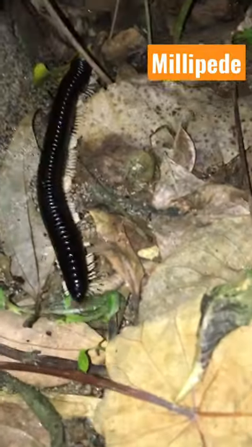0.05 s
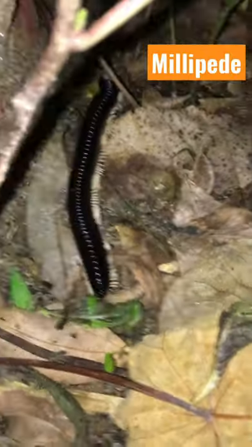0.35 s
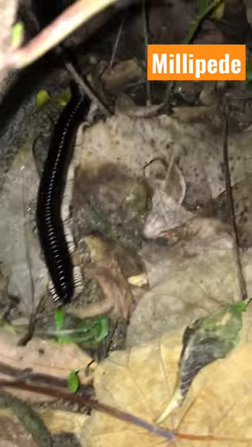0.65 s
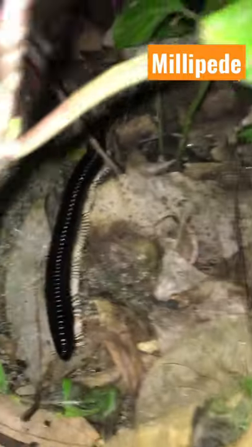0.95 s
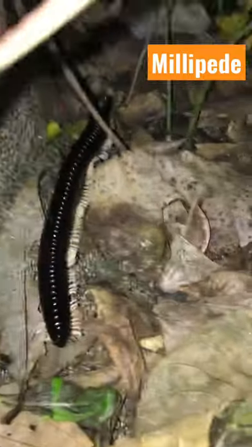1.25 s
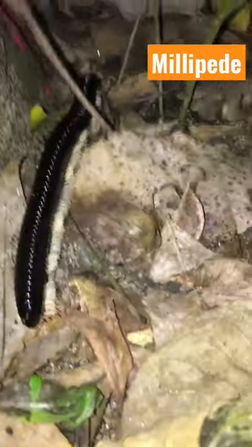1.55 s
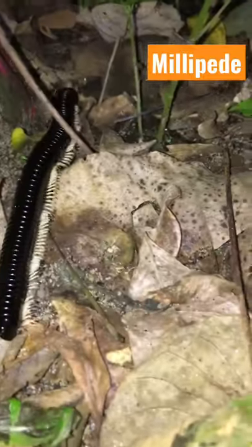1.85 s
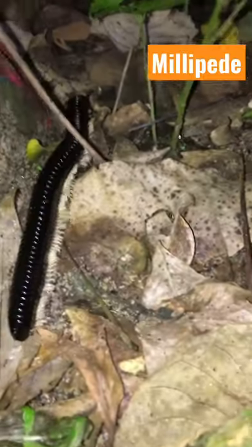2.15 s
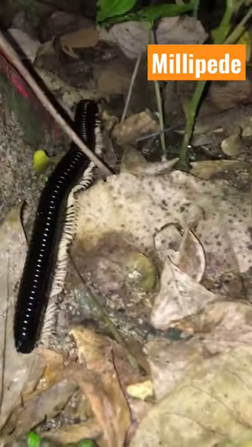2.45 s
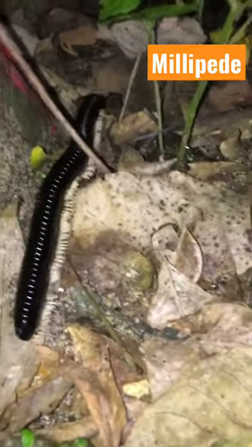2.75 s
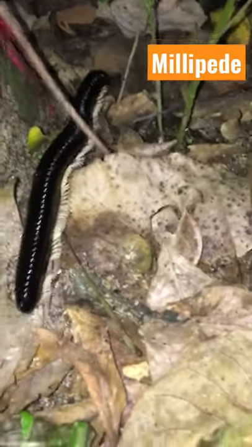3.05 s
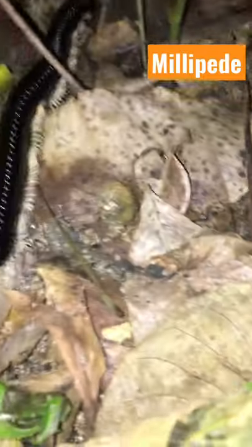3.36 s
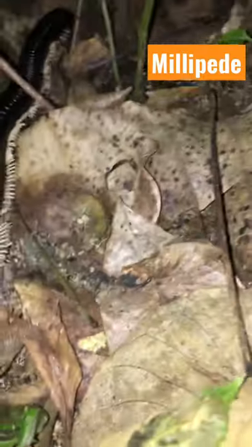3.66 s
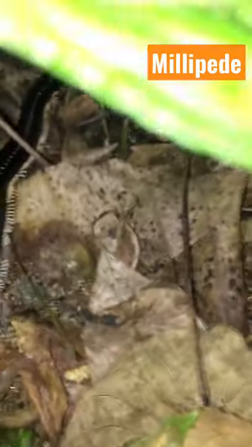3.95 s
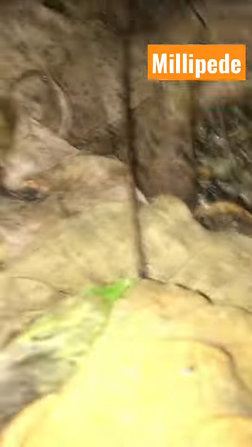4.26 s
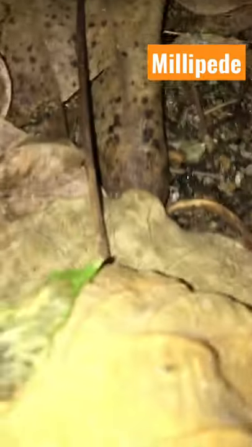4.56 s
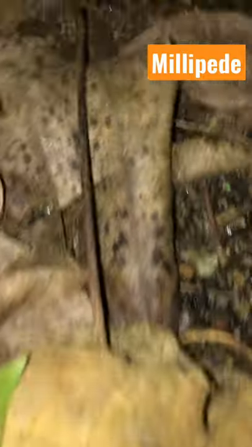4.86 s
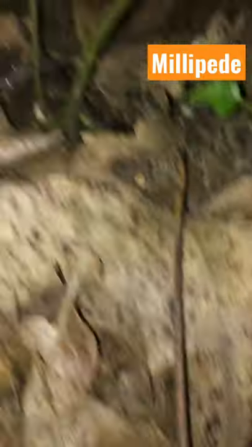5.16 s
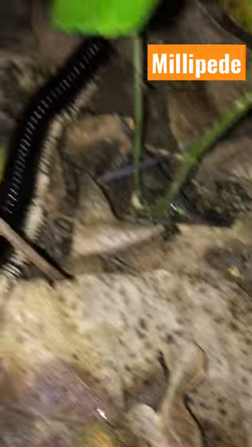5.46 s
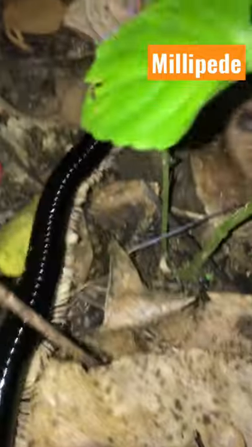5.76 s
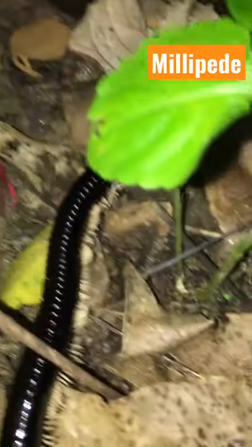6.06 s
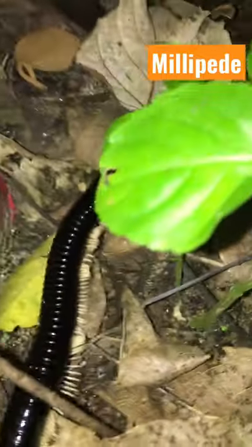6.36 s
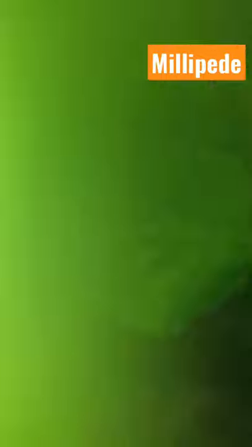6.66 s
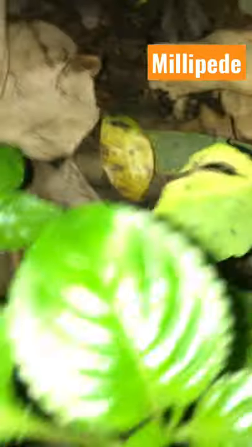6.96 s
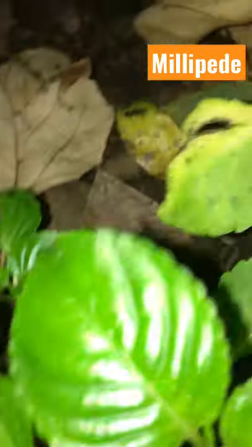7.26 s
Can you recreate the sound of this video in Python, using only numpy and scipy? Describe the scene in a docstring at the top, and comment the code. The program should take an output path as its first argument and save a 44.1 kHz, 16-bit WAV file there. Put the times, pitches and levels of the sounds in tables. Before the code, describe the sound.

Close, irregular crackling of dry leaf litter and snapping stalks, with one sharp thump of foliage on the microphone near the end.

```python
"""Dry leaf litter slides and crinkles in uneven swells as someone crouching in it at night shifts about.
Tiny fractures ring patches of leaf over sliding noise; single blades and stalks buckle and snap.
Plants knock and drag on the hand-held microphone, hardest near the end, and its housing rings.
Below: soft swishes, a dull ground shuffle, low handling rumble and a faint steady hiss."""
import sys
import numpy as np
from scipy import signal
from scipy.fft import rfft, irfft, next_fast_len
from scipy.io import wavfile
from scipy.ndimage import uniform_filter1d

SR = 44100
rng = np.random.default_rng(int(sys.argv[2]) if len(sys.argv) > 2 else 0)


def digitize_waveform(pressure):
    """Quantize a signal to 16-bit integers and store it at the path in sys.argv[1].

    Rows of a 2-D input are taken as channels; values are limited to [-1, 1].
    """
    field = np.atleast_2d(pressure).T
    bounded = np.clip(field, -1, 1)
    quanta = np.round(bounded * 32767).astype(np.int16)
    wavfile.write(sys.argv[1], SR, quanta)


N = 322812

# pushes through the litter: (peak time [s], body level [dB], top re body [dB], rise [s], fall [s])
PUSHES = [(1.14, -55, -9, 0.11, 0.094), (1.435, -49.5, -4, 0.078, .07), (1.57, -53, -5, 0.068, 0.072),
          (1.68, -57, -8, .03, .08), (2.042, -58, -6, 0.085, 0.058), (2.321, -48, 0.5, 0.084, 0.085),
          (2.41, -48, -4.5, 0.074, .14), (2.87, -49, -4, 0.023, 0.051), (2.96, -47, -5, .035, 0.025),
          (3.03, -50, -7, 0.02295, 0.041), (3.161, -50, -7, 0.063, 0.081), (3.68, -52, -6.5, 0.043, 0.0527),
          (4.19, -47, -5.5, 0.063, 0.1), (4.39, -50, -4, 0.053, 0.069), (4.5, -42, -9, 0.092, 0.083),
          (4.59, -41.5, -7.5, 0.037, 0.053), (4.69, -37, -6, 0.046, 0.0594), (4.81, -44.5, -2, .15, .2),
          (5.0, -40, -10, .14, 0.077), (5.07, -43, -7, 0.028, 0.0272), (5.151, -48, -4.5, 0.0562, .06),
          (5.218, -42, -10.5, .013, 0.048), (5.367, -42, -8, 0.051, .025), (5.42, -52, 0.5, 0.068, .11),
          (5.71, -56.5, -5, 0.11, 0.062), (5.81, -55, -5.5, .03, 0.0297), (6.04, -55.5, -1.5, 0.101, 0.077),
          (6.18, -55.5, -4, 0.019, .03), (6.311, -55.5, -4.5, .08, .08), (6.42, -55.5, -7, 0.039, 0.14),
          (6.65, -43.5, -1.5, 0.032, 0.049), (6.72, -43, -3, 0.033, 0.11), (6.91, -49, -5, .12, 0.1)]
# faint stirring between pushes: (time [s], body level [dB], top level [dB])
STIRRING = [(0, -72, -71), (.6, -72, -90), (.85, -64, -71.5), (1.8, -65, -66.5), (2.7, -72, -67),
            (3.4, -63, -68.5), (3.95, -71, -73), (5.6, -62, -63.5), (5.88, -68, -68.5), (7.3, -61, -60.5)]
# rustle body: (frequency [Hz], relative level [dB])
BODY_SPECTRUM = [(600, 0), (800, -3), (1150, -0.5), (1800, 2), (2450, -1), (3200, -4), (4000, -5.5),
                 (5000, -7)]
# crisp rustle top: (frequency [Hz], relative level [dB])
TOP_SPECTRUM = [(5000, -0.5), (6000, -0.5), (7500, -6), (9200, -2), (11000, -2.5), (13500, -6.5),
                (15700, -6)]
# blades and stalks buckling:
# (time [s], relative body level [dB], pitch [Hz], woodiness [0-1], relative top level [dB], decay [s])
BUCKLES = [(0.082, -44, 2300, 0.33, -39, 0.0012), (.6765, -44, 1550, 0.9, -60, 0.0018),
           (.9055, -54, 2980, 0, -45, .0026), (1.24, -44, 2000, 0.5, -43.5, 0.0017),
           (1.3343, -31, 1620, .7, -52, .001), (1.4435, -34, 2410, 0.2, -43, .003),
           (1.532, -37.5, 1400, 0.45, -43, 0.00225), (1.5522, -41, 2330, 0.4, -40, 0.0017),
           (1.5995, -32.5, 5140, 0.56, -45, 0.0028), (1.6645, -40.5, 2110, .3, -38, 0.0014),
           (1.7025, -54, 1620, 0.11, -40, 0.0011), (1.9733, -58, 5600, 0.4, -43, 0.0012),
           (2.053, -30.5, 3143, 0.67, -36.5, 0.0022), (2.1573, -42.5, 5600, 0.4, -45, 0.002),
           (2.1908, -45, 5500, 0.4, -42, 0.0021), (2.3565, -33.5, 4240, 0.63, -57.5, .0011),
           (2.958, -38, 2259, 0.36, -43, 0.00757), (3.1613, -37.5, 1689, 0.4, -43, 0.0027),
           (3.176, -43, 2500, 0.29, -39, .0012), (3.2215, -40.5, 1774, 0.7, -43, 0.0015),
           (3.2835, -49, 2260, 0.24, -41, 0.0011), (3.3973, -35.5, 2527, 0.5, -35.5, 0.0016),
           (3.6897, -33, 2050, 0.36, -36, 0.001893), (3.697, -30, 1774, 0.72, -50, 0.00263),
           (4.2399, -37.5, 2002, 0.45, -34, 0.0008), (4.5076, -31, 1840, .5, -29.5, 0.0036),
           (4.569, -31, 2092, 0.41, -29, .0017), (4.592, -30.5, 5555, 0.1, -27, .0029),
           (4.5994, -15, 3950, 0.75, -25, 0.00087), (4.6325, -31, 2130, 0.68, -54, 0.00086),
           (4.6764, -28, 5527, 0.3, -28, 0.002), (4.6972, -21, 2660, 0.2, -29.5, 0.0036),
           (4.699, -18, 3596, 0.77, -49, 0.0008), (4.7045, -26.5, 1540, 0.33, -29, 0.0012),
           (4.8455, -38, 5760, 0.4, -27.5, .0012), (4.9974, -32, 2486, .5, -47.5, .002),
           (5.0138, -23.5, 2375, 0.37, -26, 0.00096), (5.0595, -32.5, 2317, 0.68, -46, 0.0025),
           (5.075, -34, 2098, 0.36, -31, 0.00331), (5.1102, -28.5, 1945, .8, -53, 0.0029),
           (5.128, -34, 2050, 0.63, -52, 0.003), (5.2086, -29, 3605, 0.1, -27.5, 0.0013),
           (5.215, -49.5, 3606, 0.12, -31, 0.0021), (5.223, -36.5, 2327, 0.47, -44, .0031),
           (5.2815, -34, 2540, 0.42, -48, 0.0013), (5.345, -30.5, 3118, 0.77, -32, 0.00085),
           (5.3528, -26, 2982, 0.7, -41.5, 0.0016), (5.365, -23.5, 3105, 0.66, -40, 0.00072),
           (5.787, -52, 5495, 0.22, -36, 0.0013), (5.918, -35.5, 5440, 0.54, -34.5, 0.00099),
           (6.0414, -38.5, 1069, 0.38, -53, .0014), (6.2954, -39, 3991, 0.54, -42, 0.00089),
           (6.3853, -35, 2715, 0.45, -44, 0.00235), (6.4658, -33.5, 1211, 0.39, -36, 0.001),
           (6.5898, -37.5, 3578, 0.22, -37, 0.0017), (6.634, -42, 5530, 0.22, -31, .005),
           (6.668, -43, 2180, 0.6, -31.5, .0013), (6.7408, -25.5, 3300, 0.34, -27, 0.0019),
           (6.928, -37, 1631, 0.1, -42, 0.0037), (6.977, -39, 4110, 0.33, -58, 0.0021),
           (7.176, -29, 2533, 0.52, -53, .0012)]
# knocks on the housing: (time [s], impulse [dB], contact [s], rebounds [count])
HOUSING_KNOCKS = [(.078, -24, 0.014, 0), (3.69, -38, 0.00406, 0), (4.674, -28.5, 0.0027, 0),
                  (4.696, -31, 0.005, 1), (5.073, -34, 0.0035, 0), (6.4656, -42, 0.00064, 0),
                  (6.599, -36, 0.00076, 0), (6.633, -23.5, .0012, 0), (6.644, -17, 0.00488, 0),
                  (6.659, -27.5, 0.0022, 4), (6.733, -27, 0.0015, 0), (6.7404, -16, 0.0003, 0),
                  (6.743, -10.5, 0.00088, 3), (6.81, -29.5, 0.0022, 1)]
# housing resonances: (frequency [Hz], gain [dB], t60 [s])
HOUSING_MODES = [(84, -10.5, 0.065), (138.7, -6, 0.038), (204.3, -1.5, 0.025), (365, -5, 0.035),
                 (499.8, 0, 0.018), (789.4, -5, 0.0054), (1550, 7.5, 0.0053), (2233, 11, 0.0061)]
# foliage dragging over the housing: (peak time [s], level [dB], rise [s], fall [s])
FOLIAGE_DRAGS = [(4.479, -46.5, 0.059, 0.0635), (4.595, -36, 0.033, 0.028), (4.695, -35, 0.031, 0.0289),
                 (4.85, -44.5, 0.04, 0.0283), (5.08, -41.5, 0.058, 0.064), (5.96, -53, 0.023, 0.049),
                 (6.26, -50.5, 0.05, 0.061), (6.41, -50.5, .04, 0.12), (6.655, -25.5, 0.0247, 0.021),
                 (6.755, -30.5, 0.054, 0.039)]
# dull rubbing: (frequency [Hz], relative level [dB])
SHUFFLE_SPECTRUM = [(70, -7), (130, -1), (190, -4), (260, -8), (450, -16.5), (800, -18.5)]
# soft swishes: (time [s], level [dB], nominal low edge [Hz], nominal high edge [Hz], rise [s], t60 [s])
SWISH_BANDS = [(0.675, -51.5, 1240, 2040, .001, 1.21), (1.287, -54, 1275, 1874, 0.0032, 0.58),
               (1.333, -50.5, 1360, 1990, 0.004, 1.44), (3.795, -50.5, 2301, 2930, 0.041, .42)]
# handling rumble: (frequency [Hz], relative level [dB])
RUMBLE_SPECTRUM = [(13, -27), (22, -4), (37, 3.5), (59, 1.5), (131, -5.5), (176, -9.5), (226, -10.5),
                   (281, -14), (389, -13.5), (421, -18), (601, -19), (771, -27), (900, -25), (1170, -28),
                   (1980, -120)]
# steady hiss: (frequency [Hz], relative level [dB])
HISS_SPECTRUM = [(650, 2.5), (900, -6), (1600, -3), (2400, 4.5), (3100, -1), (3700, 2), (4400, -0.5),
                 (5400, -4), (6200, -6), (7200, -16.5), (9500, -16.5), (11000, -19), (16000, -21)]
# microphone port, three dips and one lift: (centre [Hz], width [Hz], gain [dB])
PORT_BANDS = [(2950, 380, -3), (4770, 1000, -4.5), (7200, 4500, 2.5), (10500, 1850, -6.5)]

ORDINARY_DB = -45  # rustle body level at 0 dB effort


def leaves(body_db, top_db, fractures_per_s=1300, size_spread_db=4.5, clump_db=2.5, flutter_db=2.2):
    """Harder movement gives more fractures, and more sliding of blade on blade under them."""
    effort_db = body_db - ORDINARY_DB
    rate_per_s = fractures_per_s * from_db(0.5 * effort_db + clump_db * drift(30))
    sizes = from_db(size_spread_db * np.minimum(rng.exponential(1, N), 4))
    sizes /= np.sqrt(uniform_filter1d(rate_per_s, SR // 8))  # density leaves mean power unchanged
    coarse, fine = (rng.random((2, N)) < rate_per_s / SR) * sizes
    slide_gain = from_db(0.2 * effort_db)
    slide = slide_gain * from_db(flutter_db * drift(58)) * rng.standard_normal(N)

    def with_slide(grains, weight):
        return (grains + weight * slide) / np.hypot(1, weight * slide_gain)

    body = with_slide(crinkle(coarse, 877, 6320, t60_cycles=13), weight=1.56)
    top = with_slide(crinkle(fine + 0.28 * coarse, 4800, 17000, t60_cycles=29), weight=1.17)
    body = wander(colour(body, BODY_SPECTRUM), 859, 4920, depth_db=2.4, rate_hz=7.5, count=14)
    top = wander(colour(top, TOP_SPECTRUM), 5140, 16600, depth_db=1.5, rate_hz=6.9, count=18)
    return body * from_db(body_db + 1.47) + top * from_db(top_db + 1.25)


def crinkle(fractures, low_hz, high_hz, t60_cycles, patches=14, hit_chance=0.3):
    """Each tiny fracture rings a few leaf patches, picked at random; rms 1."""
    at, out = np.flatnonzero(fractures), np.zeros(N)
    for hz in np.geomspace(low_hz, high_hz, patches):
        struck = np.zeros(N)
        struck[at] = fractures[at] * rng.standard_normal(len(at)) * (rng.random(len(at)) < hit_chance)
        out += np.diff(ring(struck, hz, t60_cycles / hz), prepend=0)
    return unit_rms(out)


def wander(x, low_hz, high_hz, depth_db, rate_hz, count):
    """As other blades come into contact, bands swell and sink independently; rms 1."""
    size = next_fast_len(N)
    bin_hz = np.arange(size // 2 + 1) * SR / size
    band_index = np.interp(bin_hz, np.geomspace(low_hz, high_hz, count), np.arange(count))
    spectrum = rfft(x, size)
    bands = (irfft(spectrum * np.maximum(1 - abs(band_index - k), 0), size)[:N] for k in range(count))
    return unit_rms(sum(part * from_db(depth_db * drift(rate_hz)) for part in bands))


def movement():
    """Pushes add power to the faint stirring; returns rustle body and top levels [dB]."""
    times_s, *levels_db = np.transpose(STIRRING)
    body, top = from_db([np.interp(np.arange(N) / SR, times_s, db) for db in levels_db]) ** 2
    for peak_s, level_db, crisp_db, rise_s, fall_s in PUSHES:
        push = swell(peak_s, level_db, rise_s, fall_s)
        body += push
        top += push * from_db(crisp_db) ** 2
    return 10 * np.log10(body), 10 * np.log10(top)


def snaps(rows, rise_share=0.4, t60_cycles=12, body_gain_db=-1.9157, top_gain_db=-6.0, size=1400):
    """A crease runs through a blade in a flurry of fractures; the woodier, the more it rings."""
    out = np.zeros(N + size)
    t = (np.arange(size) - size // 4) / SR
    decays_s = np.array(rows)[:, -1:]
    creases = np.exp(np.where(t < 0, t / rise_share, -t) / decays_s)
    coarse, fine = rng.standard_normal((len(rows), 2, size)).swapaxes(0, 1) * creases
    cracks = band(coarse, low_hz=926, high_hz=5050, passes=2)
    tops = band(fine, low_hz=6070, high_hz=13920, passes=2)
    for k, (time_s, body_db, hz, woody, top_db, _) in enumerate(rows):
        # the blade swings with the crease, then rings on
        swing = unit_burst(creases[k] * np.sin(2 * np.pi * hz * t))
        ringing = unit_burst(np.gradient(ring(fine[k], hz, t60_cycles / hz)))
        note = unit_burst(swing + ringing)
        body = unit_burst(woody * note + (1 - woody) * unit_burst(cracks[k]))
        top = unit_burst(tops[k])
        snap = from_db(body_db + body_gain_db) * body + from_db(top_db + top_gain_db) * top
        start = max(round((time_s + t[0] - 0.0004) * SR), 0)
        out[start:start + size] += snap[:len(out) - start]
    return out[:N]


def ticks(effort_db, ordinary_per_s=11, scatter_db=4.5, woody=0.42, decay_s=0.0033, candidates=200):
    """Lesser chance snaps, denser and louder with effort; rows as in BUCKLES."""
    position, luck, pitch = rng.random((candidates, 3)).T
    local_db = effort_db[(position * N).astype(int)]
    body_db, top_db = 0.42 * local_db + scatter_db * rng.standard_normal((candidates, 2)).T
    hz = 1620 * (5600 / 1620) ** pitch
    columns = np.broadcast_arrays(position * N / SR, body_db - 44.5, hz, woody, top_db - 46, decay_s)
    rate_per_s = ordinary_per_s * from_db(0.55 * local_db)
    return list(np.transpose(columns)[luck < rate_per_s * N / SR / candidates])


def knocks(rebound_gap_s=0.009, rebound_loss_db=5, rebound_contact_s=0.0026):
    """Knocks ring the housing, duller with longer contact; a springy stalk rebounds ever more weakly."""
    force = np.zeros(N)
    for time_s, impulse_db, contact_s, rebounds in HOUSING_KNOCKS:
        for k in range(round(rebounds) + 1):
            pulse = np.hanning(int((rebound_contact_s if k else contact_s) * SR))
            impulse = from_db(impulse_db - k * rebound_loss_db)
            start = round((time_s + k * rebound_gap_s) * SR)
            force[start:start + len(pulse)] += impulse * pulse / pulse.sum()
    return sum(from_db(gain_db) * ring(force, hz, t60_s) for hz, gain_db, t60_s in HOUSING_MODES)


def shuffle(effort_db, ordinary_db=-52.5, lumps_db=4):
    """Dull ground rubbing follows the effort and surges as foliage drags over the housing."""
    ground_power = from_db(ordinary_db + 0.6 * effort_db) ** 2
    drag_power = sum(swell(*drag) for drag in FOLIAGE_DRAGS)
    lumpy = rng.standard_normal(N) * from_db(lumps_db * drift(16.2))
    return np.sqrt(ground_power + drag_power) * colour(lumpy, SHUFFLE_SPECTRUM)


def swishes():
    """Narrow noise bands that rise quickly and fade."""
    out = np.zeros(N)
    for time_s, level_db, low_hz, high_hz, rise_s, t60_s in SWISH_BANDS:
        t = np.arange(N) / SR - time_s
        noise = band(rng.standard_normal(N), low_hz / 1.175, high_hz * 1.12, passes=3)
        attack = np.exp(np.minimum(t, 0) / rise_s)
        out += unit_rms(noise) * attack * from_db(level_db - 60 * np.maximum(t, 0) / t60_s)
    return out


def background(rumble_db=-50, lumps_db=1.0, hiss_db=-60.7):
    """Lumpy rumble from the hand, plus even hiss."""
    lumpy = rng.standard_normal(N) * from_db(lumps_db * drift(11))
    rumble = colour(lumpy, RUMBLE_SPECTRUM)
    hiss = colour(rng.standard_normal(N), HISS_SPECTRUM)
    return from_db(rumble_db) * rumble + from_db(hiss_db) * hiss


def swell(peak_s, level_db, rise_s, fall_s, roundness=1.3):
    """Power of one movement, 10 dB down at rise_s before and fall_s after its peak."""
    t = np.arange(N) / SR - peak_s
    away = np.maximum(-t / rise_s, t / fall_s)
    power, near = np.zeros(N), away < 5
    power[near] = from_db(level_db - 10 * away[near] ** roundness) ** 2
    return power


def drift(rate_hz, hop=40):
    """Slow random curve; rms 1."""
    pole = np.exp(-2 * np.pi * rate_hz * hop / SR)
    noise = rng.standard_normal(N // hop + 2002)
    slow = signal.lfilter([1], [1, -2 * pole, pole * pole], noise)[2000:]
    return np.interp(np.arange(N) / hop, np.arange(len(slow)), unit_rms(slow))


def ring(clicks, hz, t60_s):
    """Resonator: a unit click starts a decaying unit sine."""
    r, w = from_db(-60 / (t60_s * SR)), 2 * np.pi * hz / SR
    return signal.lfilter([0, np.sin(w)], [1, -2 * r * np.cos(w), r * r], clicks + 1e-18)


def band(x, low_hz, high_hz, passes):
    """Cascaded causal band-pass."""
    sos = signal.butter(2, [low_hz, high_hz], "band", fs=SR, output="sos")
    for _ in range(passes):
        x = signal.sosfilt(sos, x + 1e-18)
    return x


def colour(x, spectrum):
    """Shape by a spectrum, with steep roll-off past its ends; rms 1."""
    hz, level_db = np.transpose(spectrum)
    size = next_fast_len(N)
    bin_hz = np.maximum(np.arange(size // 2 + 1) * SR / size, 1)
    roll_off = 1 / np.sqrt((1 + (hz[0] / bin_hz) ** 8) * (1 + (bin_hz / hz[-1]) ** 20))
    gain = from_db(np.interp(np.log(bin_hz), np.log(hz), level_db))
    return unit_rms(irfft(rfft(x, size) * roll_off * gain, size)[:N])


def unit_burst(x):
    """Scale the loudest millisecond to rms 1."""
    return x / np.sqrt(uniform_filter1d(x * x, SR // 1000).max())


def unit_rms(x):
    """Scale to rms 1."""
    return x / np.sqrt(np.mean(x ** 2) + 1e-20)


def from_db(db):
    """Decibels to gain."""
    return 10 ** (np.asarray(db) / 20)


def scene():
    """One movement drives rustle, shuffle and ticks. Mono, close, open air, no echo."""
    body_db, top_db = movement()
    effort_db = body_db - ORDINARY_DB
    mix = leaves(body_db, top_db) + shuffle(effort_db) + knocks() + swishes() + background()
    mix += snaps(BUCKLES + ticks(effort_db))
    return mix[None]


def record(dry, low_cut_hz=42, high_cut_hz=15900, ceiling=0.55):
    """Microphone: port colouring, low cut, soft overload on the hardest knock, high cut."""
    for hz, width_hz, gain_db in PORT_BANDS:
        port_band = signal.lfilter(*signal.iirpeak(hz, hz / width_hz, fs=SR), dry)
        dry = dry + (from_db(gain_db) - 1) * port_band
    dry = signal.sosfilt(signal.butter(4, low_cut_hz, "high", fs=SR, output="sos"), dry)
    dry = ceiling * np.tanh(dry / ceiling)
    return signal.sosfilt(signal.ellip(12, 0.2, 80, high_cut_hz, fs=SR, output="sos"), dry)


dry = scene()
out = record(dry)
digitize_waveform(out)
```